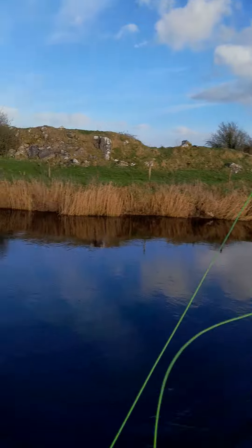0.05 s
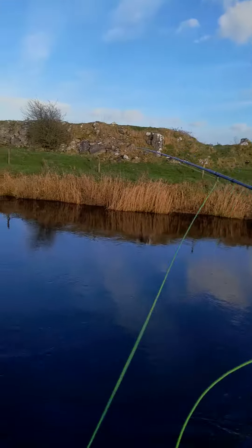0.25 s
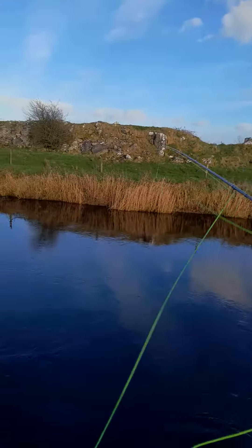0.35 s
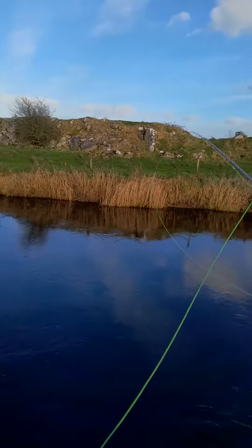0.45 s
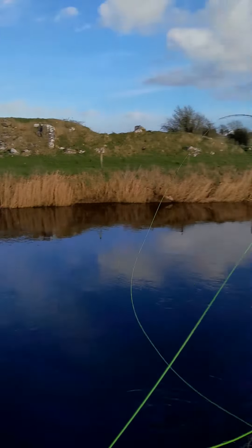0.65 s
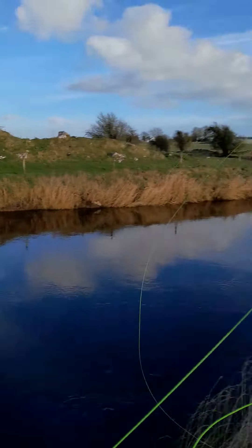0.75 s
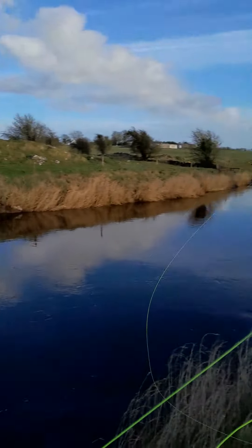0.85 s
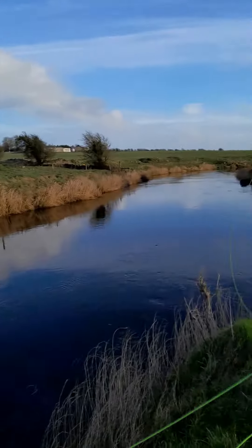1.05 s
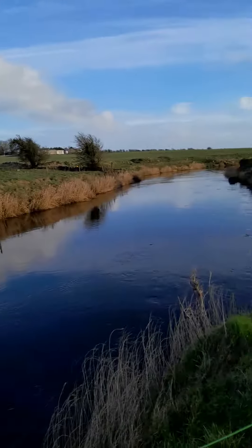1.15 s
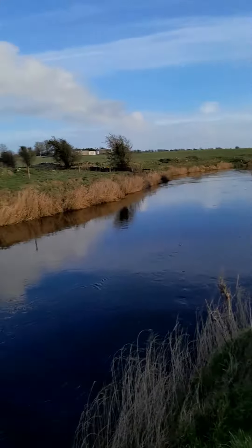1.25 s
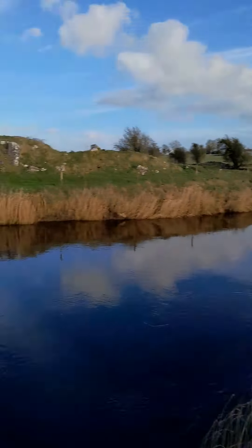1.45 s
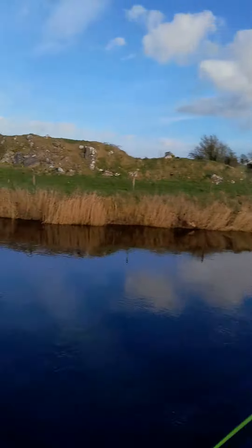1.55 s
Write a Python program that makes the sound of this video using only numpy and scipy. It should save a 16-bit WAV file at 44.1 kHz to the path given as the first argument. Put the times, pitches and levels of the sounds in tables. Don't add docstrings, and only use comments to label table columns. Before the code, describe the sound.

A fly rod and line sweep close by on a breezy riverbank: airy rush and tiny ring ticks, a bright snap on the left, falling whistles, then hard low wind buffeting, fading to near silence with faint swishes.

```python
import sys
import numpy as np
from scipy import signal
from scipy.fft import rfft, irfft, next_fast_len
from scipy.io import wavfile
from scipy.ndimage import uniform_filter1d, map_coordinates

SR = 44100
rng = np.random.default_rng(int(sys.argv[2]) if len(sys.argv) > 2 else 0)


def persist_wave(psi):
    counts = np.round(np.clip(psi, -1, 1) * 32767).astype(np.int16)
    wavfile.write(sys.argv[1], SR, np.atleast_2d(counts).T)


def boost(x):
    u = np.asarray(x, float) / 20
    return 10 ** u


N = 70560
T = np.arange(N) / SR


def unit(x):
    return x / np.sqrt(np.mean(x ** 2, axis=-1, keepdims=True) + 1e-20)


def along(points, hz):
    f, db = np.transpose(points)
    return np.interp(np.log(hz + 1), np.log(f + 1), db, left=-120, right=-120)


def colour(x, *spectra):
    m = next_fast_len(N + 8192)
    hz = np.fft.rfftfreq(m, 1 / SR)
    gain = boost([along(s, hz) for s in spectra])
    return irfft(rfft(x, m) * gain, m)[:, :N]


def curves(rows):
    s, *columns = np.transpose(rows)
    return np.array([np.interp(T, s, c) for c in columns])


def wobble(knots_per_s):
    knots = rng.standard_normal((2, 4096))
    return np.array([map_coordinates(k, [T * knots_per_s]) for k in knots])


def noise(spectrum, patchy_db=0):
    z = signal.stft(rng.standard_normal((2, N)), nperseg=256)[2]
    field = uniform_filter1d(rng.standard_normal(z.shape), size=5, axis=1)
    field = uniform_filter1d(field, size=8, axis=2)
    patchy = z * boost(patchy_db * field / field.std())
    x = signal.istft(patchy, nperseg=256)[1][:, :N]
    return unit(colour(x, spectrum))


def hump(s, length_s, rise):
    u = (T - s) / length_s
    rise = np.clip(rise, .05, .95)
    ramp = np.minimum(u / rise, (1 - u) / (1 - rise))
    return np.sin(np.pi / 2 * np.clip(ramp, 0, 1))


def swells(rows):
    return sum(boost(db) * hump(s, length_s, rise) for s, length_s, db, rise in rows)


# t/s, level/dB
GUST_LEFT = [(0, -48), (.11, -47.5), (.17, -37.5), (.24, -26), (.285, -27), (.335, -25), (.365, -24.5),
             (.425, -25), (.445, -58.5), (.52, -87.5), (.68, -84), (.715, -72.5), (.77, -72.5), (.82, -57),
             (.915, -53), (.94, -82), (1.31, -87), (1.345, -72.5), (1.6, -66)]
# t/s, level/dB
BREEZE_RIGHT = [(0, -32.5), (.03, -41), (.12, -49), (.32, -48), (.45, -54), (.62, -57), (.7, -65.5),
                (.76, -75), (.78, -57), (.9, -56), (.95, -66.5), (1.08, -67), (1.15, -57.5), (1.19, -72),
                (1.34, -58.5), (1.38, -79.5), (1.52, -70.5), (1.6, -103)]


def wind_db():
    return np.vstack([curves(GUST_LEFT), curves(BREEZE_RIGHT)])


# t/s, peak level/dB, f/Hz, length/turns, port [0 left, 1 right]
EDDIES = [(.2097, -5, 380, .7, 0), (.2097, -31, 1150, .7, 0), (.2203, -11.5, 80, 1.5, 0),
          (.2227, -11, 300, .9, 0), (.238, -18, 125, 1.4, 0), (.2465, -20, 300, .8, 0),
          (.258, -18, 150, 1.2, 0), (.2725, -17, 115, 1.6, 0), (.311, -20, 135, 1.8, 0),
          (.3222, -15, 280, 1.7, 0), (.328, -16, 110, 1.5, 0), (.3535, -17, 110, 1.2, 0),
          (.3748, -17, 520, .9, 0), (.3762, -35, 1120, 2.2, 0), (.3783, -2, 250, 1.8, 0),
          (.3857, -8, 108, 1.6, 0), (.3882, -8.5, 370, 1, 0), (.4012, -12, 165, 1.2, 0),
          (.4062, -13, 290, 1, 0), (.4133, -10, 115, 1.3, 0), (.0058, -35, 430, 1.4, 0),
          (.4295, -29, 220, 1.2, 0), (.0046, -21, 600, 1.2, 1), (.0076, -18.5, 250, 1, 1),
          (.0148, -25, 150, 1, 1), (.7785, -50, 140, 2, 1), (.7775, -57, 130, 1.5, 0),
          (.876, -45, 70, 1.8, 1), (.882, -46, 75, 1.4, 0), (.904, -44, 65, 1.3, 1),
          (.904, -49, 65, 1.5, 0), (.397, -13, 73, 2.6, 0), (.8, -50, 55, 1.5, 1), (1.341, -47, 85, 1.3, 1),
          (1.414, -55, 100, 2, 0), (1.5, -52, 60, 1.3, 0), (1.546, -51, 70, 1.3, 0),
          (1.578, -52, 75, 1.3, 0)]
# f/Hz, density/dB
THUD_SPECTRUM = [(25, -20.5), (45, 0.5), (70, -1), (130, 4), (220, -6.5), (400, -36.5), (800, -52)]
# f/Hz, density/dB
FLAP_SPECTRUM = [(100, -17.5), (200, 1), (300, -2.5), (450, -13), (700, -29.5), (1100, -43), (1500, -54.5)]
# f/Hz, gain/dB
WINDWAY = [(12, -24), (28, -2), (50, 0), (750, 0), (1200, 5), (1600, 3), (2400, -14), (4000, -60)]


def buffet():
    lump_db, lumps_per_s = 2.2, 73
    flap_offset_db, flap_growth = np.array([[-4.5], [-3]]), np.array([[1.6], [1.032]])
    thud_db = wind_db()
    peak_db = thud_db.max()
    flap_db = flap_offset_db + peak_db + flap_growth * (thud_db - peak_db)
    thud = boost(thud_db + lump_db * wobble(lumps_per_s / 2)) * noise(THUD_SPECTRUM)
    flap = boost(flap_db + lump_db * wobble(lumps_per_s)) * noise(FLAP_SPECTRUM)
    out = thud + flap
    for s, db, hz, turns, port in EDDIES:
        u = hz * (T - s)
        out[round(port)] -= boost(db) * np.cos(2 * np.pi * u) / (1 + (u / turns) ** 2) ** 3
    return colour(out, WINDWAY, WINDWAY)


# f/Hz, density/dB
HEAVE_SPECTRUM = [(24, -30), (36, -8), (55, 0), (85, -10), (130, -30)]


def heave():
    level_db = -28 + .95 * (wind_db() + 20.5)
    return boost(level_db + 4 * wobble(27)) * noise(HEAVE_SPECTRUM)


# t/s, left level/dB, right level/dB
RUSH = [(0, -48, -46), (.05, -46.5, -37.5), (.1, -49.5, -49), (.14, -48, -46.5), (.22, -48.5, -53.5),
        (.28, -55, -50.5), (.36, -59.5, -60.5), (.47, -68.5, -68), (.6, -72.5, -64.5), (.75, -68, -65.5),
        (.83, -67.5, -61.5), (.91, -64, -64), (.97, -68, -71.5), (1.07, -72.5, -72), (1.14, -67.5, -64.5),
        (1.36, -72.5, -68), (1.5, -63, -62), (1.6, -55, -53)]
# f/Hz, density/dB
AIR_SPECTRUM = [(500, 2), (1000, -2), (2000, 1), (4000, -7.5), (8000, -13.5), (15800, -17)]


def rush():
    return boost(curves(RUSH) + 1.2 * wobble(25)) * noise(AIR_SPECTRUM, patchy_db=1.5)


# t/s, left level/dB, right level/dB
REEDS = [(0, -58, -50.5), (.3, -62, -56.5), (.5, -63, -69), (.6, -58.5, -61), (.72, -81.5, -86),
         (.9, -65, -62.5), (1, -70, -70), (1.26, -72.5, -71), (1.4, -81, -74), (1.48, -78.5, -75),
         (1.54, -64.5, -60.5), (1.6, -67.5, -72)]
# f/Hz, density/dB
REED_SPECTRUM = [(120, -27.5), (200, -2.5), (350, 7), (650, 0), (1000, -8), (1600, -27)]


def reeds():
    return boost(curves(REEDS) + 2 * wobble(30)) * noise(REED_SPECTRUM)


# f/Hz, density/dB
HISS_SPECTRUM = [(60, -17), (300, -2.5), (2000, -18), (8000, -16.5), (9500, -16.5), (15900, -7.5)]


def microphone_hiss():
    return boost(-84) * noise(HISS_SPECTRUM)


# t/s, length/s, level/dB, rise share [0-1]
RUBS = [
    (0.01, 0.019, -56, 0.4),
    (0.109, .035, -60.5, .3),
    (1.103, 0.25, -59.5, 0.69),
    (1.297, 0.1205, -58.5, 0.32),
    (1.374, 0.096, -59, 0.26),
    (1.499, 0.152, -62.5, 0.84),
]
# f/Hz, density/dB
RUB_SPECTRUM = [(600, -11.5), (1500, -11), (3000, 6.5), (7000, 1), (12000, 3), (15800, 0)]
# t/s, peak level/dB, f/Hz
TICKS = [(.017, -33, 4500), (.033, -32, 3000), (.0425, -27, 2000), (.062, -30, 2500), (.118, -36, 2500),
         (.127, -38, 6000), (.165, -37, 2500), (.235, -42, 4500), (.277, -38, 3500), (.293, -43, 4500),
         (.445, -55, 4500), (.59, -58, 5500), (.676, -51, 5500), (.708, -54, 2000), (.815, -54, 5500),
         (.882, -49, 900), (1.292, -50, 2500), (1.405, -46, 4000), (1.455, -53, 3000)]


def rings():
    grain_db, grains_per_s, left_db, tick_cycles = 3, 2000, -27, .7
    out = swells(RUBS) * boost(grain_db * wobble(grains_per_s)[0]) * noise(RUB_SPECTRUM)
    for s, db, hz in TICKS:
        t = np.clip(T - s, 0, None)
        decay = (t > 0) * np.exp(-t * hz / tick_cycles)
        out[1] += boost(db) * decay * np.sin(2 * np.pi * hz * t) * np.e
    return out * boost([[left_db], [0]])


# f/Hz, density/dB
SNAP_SPECTRUM = [(2500, -25), (4000, -16), (5500, -5.5), (7000, -5.5), (7900, 3.5), (9000, -1.5),
                 (12000, -20.5), (15800, -14.5)]


def snap():
    start_s, rise_s, level_db = 0.1039, .004, -24
    t60_s, tail_db, tail_t60_s = 0.062, -30.5, .4
    t = np.clip(T - start_s, 0, None)
    decay = boost(-60 * t / t60_s) + boost(tail_db - 60 * t / tail_t60_s)
    shape = (1 - np.exp(-t / rise_s)) * decay
    return boost(level_db) * shape * noise(SNAP_SPECTRUM, patchy_db=3) * [[1], [0]]


# f/Hz, density/dB
FIZZ_SPECTRUM = [(9000, -12), (11500, 1), (15800, 4)]


def fizz():
    return boost(-52) * hump(.104, .045, .5) * noise(FIZZ_SPECTRUM) * [[1], [0]]


# t/s, length/s, level/dB, start f/Hz, end f/Hz
WHISTLES = [
    (.112, .045, -48, 6100, 3100),
    (.127, .011, -45, 4300, 3700),
    (.143, .013, -48, 4500, 3200),
    (.132, .022, -52, 7600, 8300),
    (.158, .064, -53, 5800, 4000),
    (.194, .011, -49, 5300, 5000),
    (.206, .012, -49, 4500, 3900),
    (.203, .012, -54, 7900, 7200),
]


def whistles():
    width_hz = 1050
    out = np.zeros(N)
    for s, length_s, db, start_hz, end_hz in WHISTLES:
        hz = np.interp(T, [s, s + length_s], [start_hz, end_hz])
        phase = 2 * np.pi * np.cumsum(hz) / SR
        a, b = wobble(width_hz)
        out += boost(db) * hump(s, length_s, 0.45) * (a * np.cos(phase) + b * np.sin(phase))
    return out * [[1], [0]]


# t/s, length/s, level/dB, rise share [0-1]
TEARS = [
    (0.2096, 0.0081, -39, 0.3),
    (0.218, 0.014, -41, 0.44),
    (0.224, .01, -48, .5),
    (0.242, .011, -43.5, .5),
    (.262, 0.0085, -48, 0.4),
    (0.307, .025, -48, 0.4),
    (0.369, .012, -25.5, 0.52),
    (0.381, 0.0081, -31.5, 0.2),
    (0.397, 0.0091, -33.5, .4),
    (0.406, 0.013, -36, .4),
]
# f/Hz, density/dB
TEAR_SPECTRUM = [(350, -9.5), (550, 6.5), (800, -7), (1100, -11), (1500, -29.5), (1900, -36.5)]


def tearing():
    return swells(TEARS) * boost(3 * wobble(300)) * noise(TEAR_SPECTRUM) * [[1], [0]]


# t/s, length/s, level/dB, rise share [0-1]
SWISHES = [
    (0.715, 0.28, -64, 0.63),
    (1.291, 0.24, -68.5, 0.17),
]
# f/Hz, density/dB
SWISH_SPECTRUM = [(1800, -12), (2700, 8), (3600, 1.5), (5300, -12), (7000, -5.5), (9000, -9.5),
                  (15800, -17)]


def swish():
    return swells(SWISHES) * noise(SWISH_SPECTRUM) * [[1], [0]]


# f/Hz, gain/dB
HOUSING_LEFT = [(20, -25.5), (2800, -5), (5300, -3.5), (7800, 0), (8600, -3), (9400, -13), (11000, -5),
                (16000, -2)]
# f/Hz, gain/dB
HOUSING_RIGHT = [(20, 7.5), (3000, -6.5), (5000, -5), (6900, -1.5), (7600, -11.5), (8800, -14.5),
                 (10500, -6.5), (16000, -7)]


def housings(x):
    return colour(x, HOUSING_LEFT, HOUSING_RIGHT)


def scene():
    out = buffet() + reeds()
    out += housings(rush() + rings() + swish() + snap() + whistles() + fizz())
    out += microphone_hiss()
    return out + tearing() + heave()


def roll_off(x):
    return signal.sosfilt(signal.butter(12, 15970, fs=SR, output="sos"), x)


def record(dry):
    m = next_fast_len(N)
    passed = np.fft.rfftfreq(m, 1 / SR) < 15900
    mix = irfft(rfft(dry, m) * passed, m)[:, :N]
    return roll_off(mix)


dry = scene()
out = record(dry)
persist_wave(out)
```